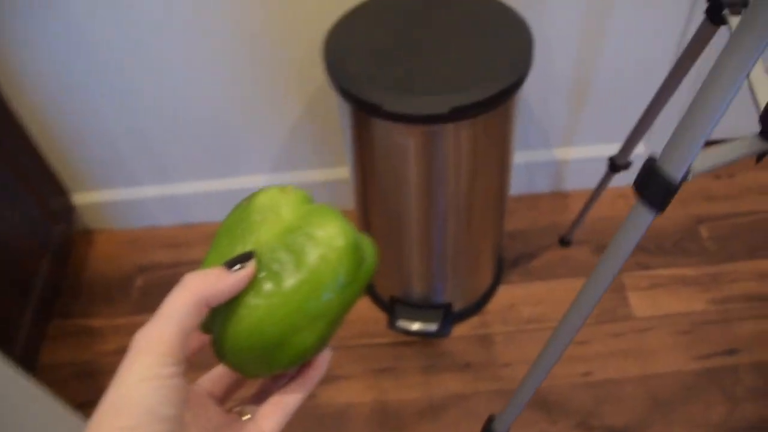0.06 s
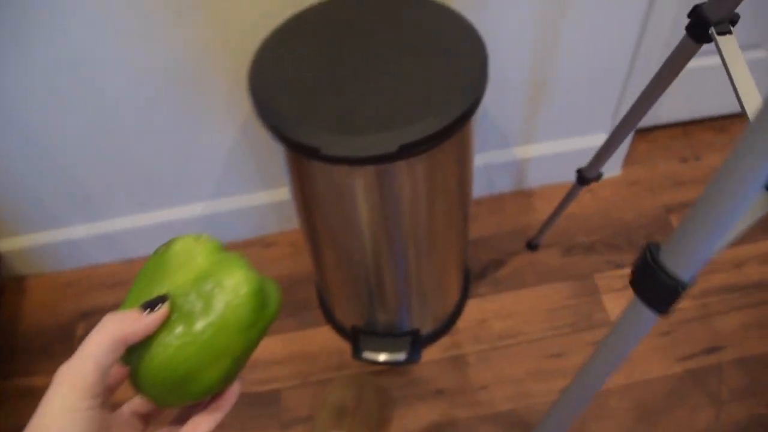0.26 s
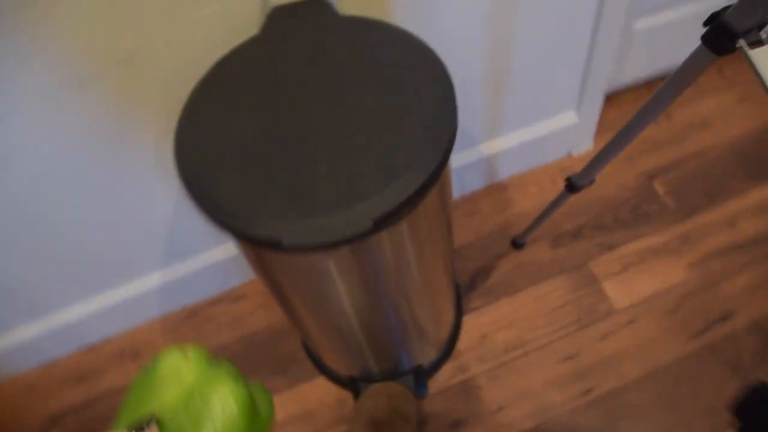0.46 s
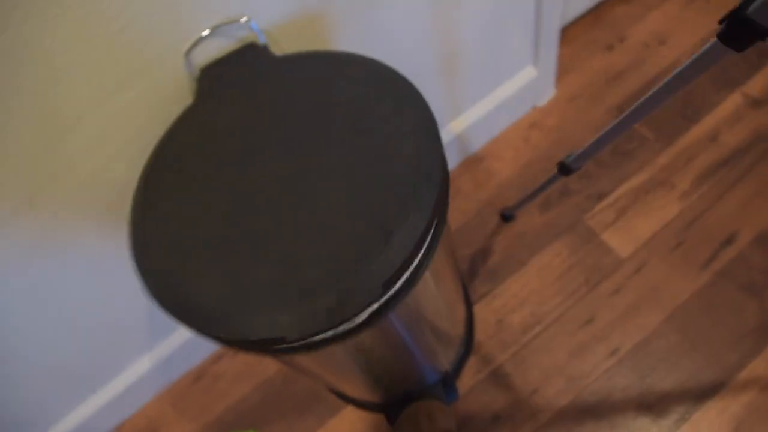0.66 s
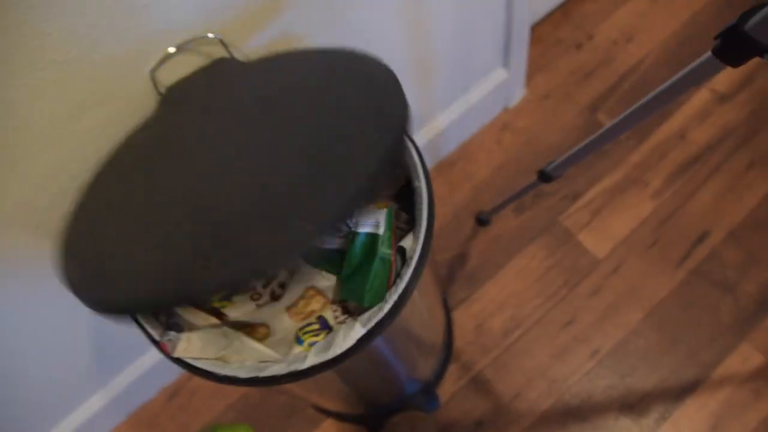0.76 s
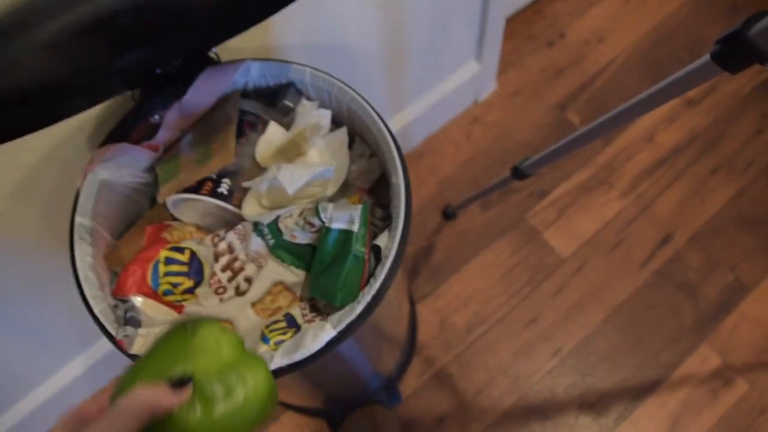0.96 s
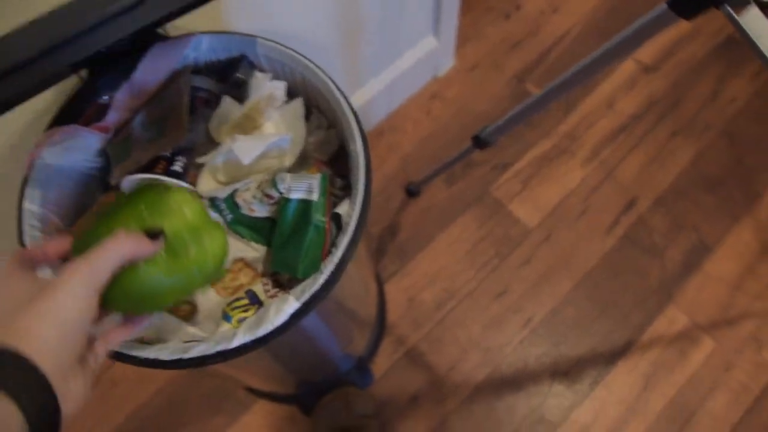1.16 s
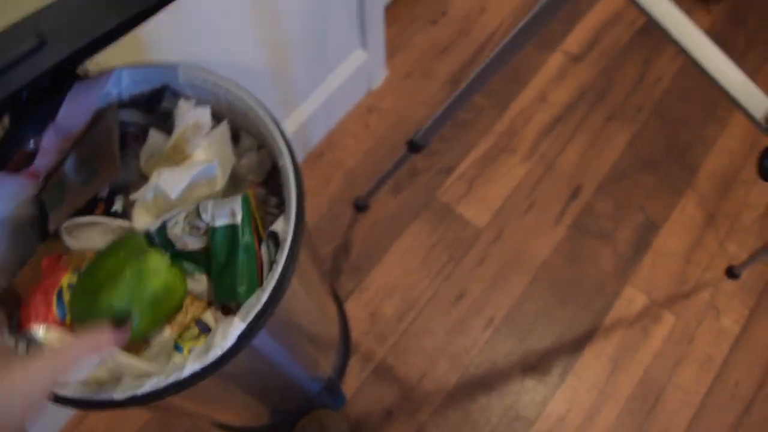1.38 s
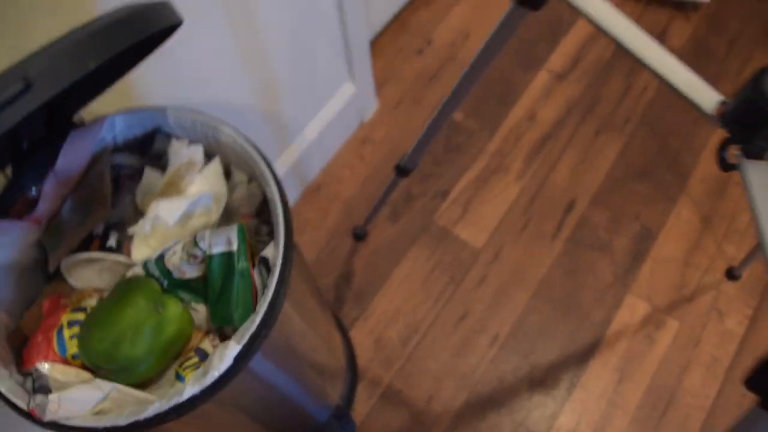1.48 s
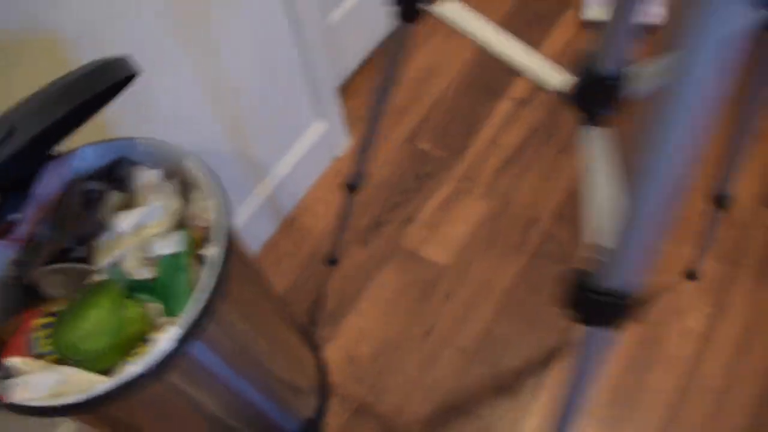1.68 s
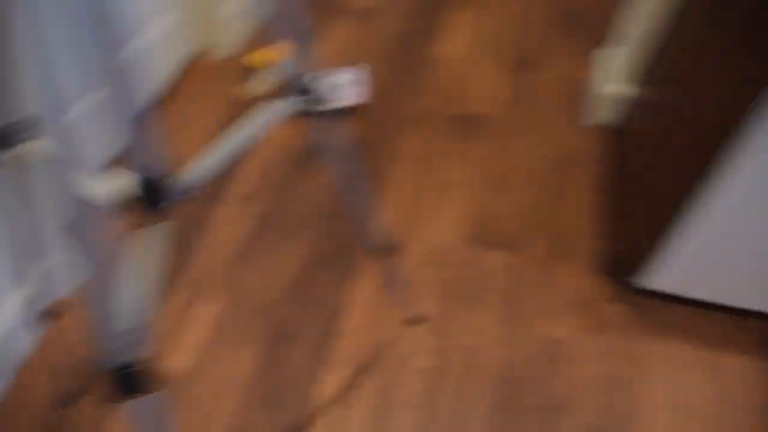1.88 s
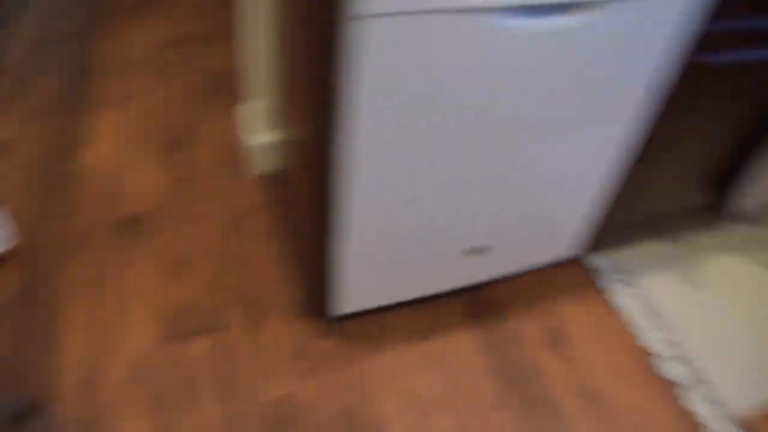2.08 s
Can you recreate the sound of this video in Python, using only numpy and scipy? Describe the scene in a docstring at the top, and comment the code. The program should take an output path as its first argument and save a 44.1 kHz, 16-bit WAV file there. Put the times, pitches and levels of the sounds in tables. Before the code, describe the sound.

A metal step-on bin knocks open, something thuds onto wrappers inside, and the lid claps shut.

```python
"""A small, hard kitchen, heard from just above a steel step-on bin.
The echo of a dull knock dies away; a shoe scuffs and clacks the pedal down. The lid knocks its way
open against its stop, booming as it flexes and ringing the can; the hinge rattles and squeaks.
A pepper thuds onto crackling wrappers. The lid claps shut among dull bumps of footfall and handling."""
import sys
import numpy as np
from scipy import signal
from scipy.fft import rfft, irfft, next_fast_len
from scipy.io import wavfile

SR = 44100
rng = np.random.default_rng(int(sys.argv[2]) if len(sys.argv) > 2 else 0)


def wrap_up_sound(samples):
    """Save the sound to the file named by the first command line argument, as 16-bit audio."""
    columns = np.atleast_2d(samples).T
    # keep every value between -1 and 1, then stretch to whole-number steps
    tamed = np.clip(columns, -1, 1)
    steps = np.round(tamed * 32767).astype(np.int16)
    wavfile.write(sys.argv[1], SR, steps)


N = 93977
LEAD_S, LANES = .2, 8
SIZE = next_fast_len(2 * N)
T = np.arange(SIZE) / SR


def undb(db):
    """Decibels to gain."""
    return 10 ** (np.asarray(db) / 20)


def bin_hz(size):
    """FFT bin frequencies, floored at 1 Hz."""
    return np.maximum(np.fft.rfftfreq(size, 1 / SR), 1)


def along(points, hz):
    """Read a table on a log-frequency axis."""
    freqs, values = np.array(points).T
    return np.interp(np.log(hz), np.log(freqs), values)


def unit(x):
    """Scale to unit energy."""
    return x / np.sqrt(np.sum(x ** 2) + 1e-18)


def track():
    """Empty lanes, one per echo pattern, since the listening point keeps moving."""
    return np.zeros((LANES, SIZE))


def add(lanes, s, db, x, over_s=.01):
    """Mix x into a random lane at time s; db is its RMS level if its energy were spread across over_s."""
    start = max(int((s + LEAD_S) * SR), 0)
    x = x[:SIZE - start]
    lanes[rng.integers(LANES), start:start + len(x)] += undb(db) * np.sqrt(SR * over_s) * unit(x)


def tint(x, colour, edge_hz=np.inf, size=4096):
    """Minimum-phase filter of the given colour, falling 12 dB/octave more above the edge."""
    hz = bin_hz(size)
    gain = undb(along(colour, hz)) / np.hypot(1, (hz / edge_hz) ** 2)
    cepstrum = irfft(np.log(gain))
    cepstrum[1:size // 2] *= 2
    cepstrum[size // 2 + 1:] = 0
    impulse = irfft(np.exp(rfft(cepstrum)))[:size // 2]
    return signal.fftconvolve(x, impulse)


def fade(t, t60_s):
    """Decay by 60 dB in t60_s."""
    return np.exp(-np.log(1000) * t / t60_s)


def crack(t60_s, rise_s=.00042):
    """A contact's dense, quickly dying vibration."""
    t = T[:int(2 * t60_s * SR) + 20]
    attack = np.minimum(t / rise_s, 1)
    envelope = fade(t, t60_s) * attack
    x = rng.standard_normal(2 ** 14)[:len(t)] * envelope
    for _ in range(3):  # flatten the spectrum, then restore the decay
        flat = irfft(np.exp(1j * np.angle(rfft(x))), len(t))
        x = flat * np.minimum(10 * envelope, 1)
    return x * attack


def ring(modes, contact_s=.0017):
    """Struck modes, neighbours in opposite phase, rising over the contact time."""
    t = T[:SR]
    swing = sum((-1) ** k * undb(db) * np.sin(2 * np.pi * hz * t) * fade(t, t60_s)
                for k, (hz, db, t60_s) in enumerate(modes))
    return swing * np.sin(np.pi / 2 * np.minimum(t / contact_s, 1)) ** 2


def grains(length_s, per_s, spread_db):
    """A swell of tiny random slips of uneven size."""
    n = int(length_s * SR)
    slips = rng.random(SR)[:n] < per_s / SR
    gain = undb(spread_db * np.minimum(rng.exponential(size=SR)[:n], np.pi))
    sign = rng.choice([-1, 1], SR)[:n]
    swell = np.sin(np.pi * np.arange(n) / n) ** .5
    return slips * sign * gain * swell


# room tone spectrum (frequency [Hz], gain [dB])
ROOM_TONE_COLOUR = [(25, 1), (60, -7.5), (140, 2.5), (250, -2), (450, 0.5), (1000, -4.5), (1600, -8),
                    (4400, -20), (11000, -36.5), (16000, -40)]


def room_tone(level_db=-53.5):
    """Quiet steady noise, returned as a spectrum."""
    noise = tint(rng.standard_normal(SIZE), ROOM_TONE_COLOUR)[:SIZE]
    return rfft(undb(level_db) * np.sqrt(SIZE) * unit(noise))


# dull knock spectrum (frequency [Hz], gain [dB])
DULL_KNOCK_COLOUR = [(60, -4), (190, -5.5), (400, -1.5), (950, 2.5), (2000, -9), (5000, -20.5),
                     (14000, -41)]


def dull_knock():
    """A knock just before time zero, heard only by its echo."""
    out = track()
    add(out, s=-.066, db=-26.5, x=tint(crack(t60_s=.021), DULL_KNOCK_COLOUR))
    return out


# shoe scuffs (time [s], length [s], level [dB], upper edge [Hz])
SCUFFS = [(0.231, 0.037, -49.5, 920), (0.287, 0.017, -46.5, 5000), (0.264, 0.057, -46.5, 12000),
          (1.672, 0.014, -32.5, 2400), (1.686, 0.079, -35.5, 1560), (1.767, 0.061, -52, 12100),
          (1.827, 0.058, -43.5, 2420), (1.886, 0.075, -32, 2450)]
# scuff spectrum (frequency [Hz], gain [dB])
SCUFF_COLOUR = [(80, -16), (300, -3), (550, 0), (850, -1), (1300, -6.5), (2300, -3), (5000, -9.5),
                (16000, -24)]


def scuffs():
    """The shoe rubs on floor and pedal."""
    out = track()
    for s, length_s, db, edge_hz in SCUFFS:
        friction = grains(length_s, per_s=2800, spread_db=3)
        add(out, s, db, tint(friction, SCUFF_COLOUR, edge_hz), over_s=length_s)
    return out


# pedal and linkage clacks (time [s], level [dB])
PEDAL_CLACKS = [(.351, -49), (.417, -47), (.4735, -21), (0.4758, -16.5), (.480, -18.5)]
# pedal clack spectrum (frequency [Hz], gain [dB])
PEDAL_COLOUR = [(40, -33), (90, -9), (160, -13), (250, -2), (330, -5.5), (470, 4), (680, -1), (800, 0.5),
                (970, -0.5), (1450, -6), (2000, -2), (2800, -6), (4300, -11.5), (6000, -22), (10000, -38.5),
                (14000, -48), (16000, -64)]
# steel pedal rod (frequency [Hz], gain [dB], t60 [s])
ROD_MODES = [(1290, 0, 0.043), (2010, -4, 0.028), (2624, 5, 0.026), (2860, 0, 0.052), (4006, -9, 0.047)]
# steel can (frequency [Hz], gain [dB], t60 [s])
CAN_MODES = [(270.3, 1, 0.25), (326, -5.5, 0.69), (351, 1, 0.51), (446, 5, 0.63), (695, -3.5, 0.6),
             (774, -8, 0.96), (907, -1.5, .65), (1123, -8.5, 0.31), (1200, -5.5, .85), (1335, -4.5, 0.77)]


def pedal(rod_db=-8, can_db=-13.5):
    """The pedal clacks, its rod clinks and the can rings faintly."""
    out, can, rod = track(), ring(CAN_MODES), ring(ROD_MODES)
    for s, db in PEDAL_CLACKS:
        add(out, s, db, tint(crack(t60_s=.055), PEDAL_COLOUR))
        add(out, s, db + rod_db, rod)
        add(out, s, db + can_db, can)
    return out


# opening knocks (time [s], boom level [dB], clack level [dB], clack edge [Hz], boom pitch [ratio])
LID_KNOCKS = [(0.6827, -28.5, -27.5, 1600, 1.02), (0.707, -32.5, -44, 1200, .97),
              (0.742, -27.5, -40, 1190, 1.01), (0.7617, -12, -20.5, 1100, .97),
              (0.7727, -12.5, -22.5, 1730, 1.08), (0.7878, -23.5, -24, 1570, .95),
              (.864, -12.5, -26, 3100, 1.03), (0.876, -19.5, -24.5, 2580, .95),
              (0.8975, -19, -19.5, 5000, 1.04), (.902, -27.5, -21, 3500, 1.01)]
# flexing lid (frequency [Hz], gain [dB], t60 [s])
LID_MODES = [(103.3, -22, 0.45), (140.5, -19, 0.17), (202, -10.5, 0.1), (245, -15.5, 0.17),
             (364.8, 8, 0.066), (446.6, 0.5, 0.075), (830, 4, 0.027)]
# lid clack spectrum (frequency [Hz], gain [dB])
LID_CLACK_COLOUR = [(50, -20), (150, -14), (380, 0.5), (700, 1), (1200, 1), (1600, -8), (3000, -18.5),
                    (5000, -15.5), (8000, -44), (16000, -45)]


def lid_opens(can_db=-9.5):
    """Each knock is a clack and a short boom of the flexing lid, which sets the can ringing."""
    clack, boom, can = track(), track(), ring(CAN_MODES)
    for s, boom_db, clack_db, edge_hz, pitch in LID_KNOCKS:
        modes = [(hz * pitch, db, t60_s) for hz, db, t60_s in LID_MODES]
        add(boom, s, boom_db, ring(modes))
        contact = crack(t60_s=.021, rise_s=.00096)
        add(clack, s, clack_db, tint(contact, LID_CLACK_COLOUR, edge_hz))
        add(boom, s, max(boom_db, clack_db) + can_db, can)
    return clack, boom


# hinge rattles (time [s], level [dB])
RATTLES = [(0.76, -41), (0.776, -37.5), (0.861, -33), (0.895, -30.5)]
# rattle spectrum (frequency [Hz], gain [dB])
RATTLE_COLOUR = [(300, -32), (1500, 2), (3000, 10), (5000, -5.5), (9000, -17.5), (16000, -33.5)]


def hinge_rattles():
    """The loose hinge rattles with the harder knocks."""
    out = track()
    for s, db in RATTLES:
        add(out, s, db, tint(crack(t60_s=.11, rise_s=.0016), RATTLE_COLOUR))
    return out


# hits on the stop (time [s], level [dB])
CLANKS = [(0.7884, -23.5), (.898, -17), (0.9021, -17)]
# lever and stop (frequency [Hz], gain [dB], t60 [s])
CLANK_MODES = [(420, 0.5, .022), (872, 3.5, 0.043), (1150, -7, 0.022), (1360, -5, 0.03)]


def stop_clanks():
    """The lid's steel lever hits its stop."""
    out, clank = track(), ring(CLANK_MODES)
    for s, db in CLANKS:
        add(out, s, db, clank)
    return out


# hinge squeaks (time [s], level [dB], pitch [Hz])
SQUEAKS = [(.8355, -33.5, 1923), (.8615, -24, 1956), (0.877, -35, 1973)]


def hinge_squeaks(length_s=.015, waver_depth=.056):
    """The hinge squeaks in short swelling tones of wavering pitch."""
    out, n = track(), int(length_s * SR)
    swell = np.sin(np.pi * np.arange(n) / n)
    for s, db, hz in SQUEAKS:
        waver = np.interp(T[:n], np.linspace(0, length_s, 10), rng.standard_normal(10))
        phase = 2 * np.pi * np.cumsum(hz * (1 + waver_depth * waver)) / SR
        add(out, s, db, np.sin(phase) * swell)
    return out


# pepper impacts (time [s], level [dB])
THUDS = [(1.3322, -41), (1.349, -24), (1.358, -21.5), (1.3653, -21)]
# thud spectrum (frequency [Hz], gain [dB])
THUD_COLOUR = [(35, -40), (60, -16), (170, -6.5), (323, 1.5), (469, -13.5), (850, -1.5), (1060, -6),
               (2090, -6.5), (2470, -20), (3420, -5), (4220, -25), (11000, -36), (16000, -44)]
# hollow above the rubbish (frequency [Hz], gain [dB], t60 [s])
HOLLOW_MODES = [(174, -2, 0.057), (240, -2.5, 0.074), (333, 4, 0.065), (410.4, -1.5, 0.1), (764, 6, 0.057),
                (878, 1.5, 0.23)]


def pepper(hollow_db=-3):
    """The pepper lands in quick stages and sounds the hollow of the bin."""
    out, hollow = track(), ring(HOLLOW_MODES)
    for s, db in THUDS:
        add(out, s, db, tint(crack(t60_s=.039), THUD_COLOUR))
        add(out, s, db + hollow_db, hollow)
    return out


# crease snaps (time [s], level [dB], upper edge [Hz], crease pitch [Hz])
SNAPS = [(1.338, -43, 3440, 2700), (1.3539, -29, 13200, 5660), (1.3671, -22, 6200, 3440),
         (1.3754, -36, 11000, 2920), (1.3858, -35, 9000, 3880), (1.441, -29, 6800, 3370),
         (1.453, -30, 5500, 1900), (1.47, -34.5, 4000, 3020), (1.4978, -29, 8950, 3240),
         (1.5155, -37, 14000, 4400), (1.5212, -27, 15200, 3510), (1.5308, -32, 5500, 3500),
         (1.545, -32.5, 6000, 3210), (1.5481, -27.5, 11000, 3250), (1.553, -32, 7140, 2630),
         (1.5628, -32.5, 4530, 2120), (1.5709, -34, 4500, 2260)]
# spells of crinkling (time [s], length [s], level [dB])
CRINKLES = [(1.348, 0.05, -34), (1.41, 0.052, -37.5), (1.503, 0.06, -35.5)]
# creased film and the hollows under it (frequency [Hz], gain [dB])
WRAPPER_COLOUR = [(100, -26.5), (320, 1), (550, 2), (800, 2), (1300, 1), (1900, 3.5), (2600, -1),
                  (3400, 3.5), (4300, -2), (6500, -4), (8000, -7), (14000, -11), (16000, -25)]


def wrappers(crease_db=-10.5):
    """Plastic wrappers snap under the weight and crinkle as the rubbish settles."""
    out = track()
    for s, db, edge_hz, crease_hz in SNAPS:
        add(out, s, db + crease_db, ring([(crease_hz, 0, .012)]))
        add(out, s, db, tint(crack(t60_s=.0109), WRAPPER_COLOUR, edge_hz))
    for s, length_s, db in CRINKLES:
        crinkle = grains(length_s, per_s=800, spread_db=2)
        add(out, s, db, tint(crinkle, WRAPPER_COLOUR, edge_hz=5000), over_s=length_s)
    return out


# dull bumps (time [s], level [dB], pitch [Hz])
BUMPS = [(1.713, -37, 100), (1.742, -37.5, 154), (1.762, -35.5, 113), (1.792, -34, 96), (1.846, -33.5, 214),
         (1.856, -27.5, 183), (1.882, -29.5, 135), (1.893, -33.5, 74.5), (1.945, -35.5, 90),
         (2.042, -30.5, 108)]


def bumps(t60_s=.051, side_db=8):
    """Footfall and handling: low thumps of a few cycles, unequal left and right."""
    mid, side = track(), track()
    side_colour = [(25, 3), (70, -14), (200, 1.5), (600, -18)]  # (frequency [Hz], gain [dB])
    for s, db, hz in BUMPS:
        add(mid, s, db, ring([(hz, 0, t60_s)]))
        add(side, s, db + side_db, tint(crack(t60_s=.1), side_colour, edge_hz=hz))
    return mid, side


# lid clap spectrum (frequency [Hz], gain [dB])
CLAP_COLOUR = [(180, -41.5), (300, -2.5), (379, -12.5), (565, -16), (1120, -14), (1900, -19.5),
               (4370, -19.5), (7000, -28.5), (11300, -48), (14500, -55), (16000, -69)]
# steel rim (frequency [Hz], gain [dB], t60 [s])
RIM_MODES = [(2160, -7, 0.033), (3454, -1.5, 0.074), (4840, 1, 0.023), (5100, 1, 0.03)]
# closed bin (frequency [Hz], gain [dB], t60 [s])
CLOSED_BIN_MODES = [(266, 6, 0.039), (459, -21, 0.52), (270.8, -12.5, 0.45), (577.4, -19, 0.59),
                    (222, -20, 0.012)]


def lid_shuts(at_s=1.9098, clap_db=-25, rim_db=-37.5, boom_db=-18.5):
    """The lid meets the rim: a sharp clap, a brief ring of steel and the boom of the closed bin."""
    clap, boom = track(), track()
    add(clap, at_s, clap_db, tint(crack(t60_s=.015), CLAP_COLOUR))
    add(clap, at_s, rim_db, ring(RIM_MODES))
    add(boom, at_s, boom_db, ring(CLOSED_BIN_MODES))
    return clap, boom


# kitchen decay (frequency [Hz], t60 [s])
ROOM_T60 = [(80, 0.48), (300, 0.65), (1000, 0.69), (3000, 0.54), (6000, 0.64), (14000, 0.44)]


def kitchen_echoes(delay_s=.0048, build_s=.0012):
    """Diffuse reflections off hard walls, one spectrum per lane; the top treble dies first."""
    centres_hz, t = np.geomspace(60, 16000, 7), T[:SR]
    noise = rfft(rng.standard_normal((LANES, SR)))
    tail = np.zeros((LANES, SR))
    for hz, weights in zip(centres_hz, np.eye(len(centres_hz))):
        band = along(list(zip(centres_hz, weights)), bin_hz(SR))
        tail += irfft(noise * band, SR) * fade(t, along(ROOM_T60, hz))
    onset = np.clip((t - delay_s) / build_s, 0, 1)
    return rfft(np.sqrt(LANES) * unit(tail * onset), SIZE)


# stereo width of the sounds (frequency [Hz], side gain [dB])
SOUND_WIDTH = [(60, -31), (110, -50), (200, -54), (380, -55), (700, -40), (1290, -40.5), (2380, -29),
               (4400, -26.5), (8120, -16), (15000, -8)]
# stereo width of the room tone (frequency [Hz], side gain [dB])
ROOM_TONE_WIDTH = [(60, -8), (110, -20), (200, -14.5), (380, -14), (1290, -20.5), (2380, -9.5), (4400, -16),
                   (8120, 0.5)]


def scene(direct_side_db=9):
    """All sources with their share of the room; nearly mono except in the treble and deep bass."""
    lid_clack, lid_boom = lid_opens()
    clanks, rattles, squeaks = stop_clanks(), hinge_rattles(), hinge_squeaks()
    clap, bin_boom = lid_shuts()
    bump_mid, bump_side = bumps()
    # (lanes, room send [dB])
    sources = [(dull_knock(), -.5), (pedal(), -4),
               (lid_clack, -2), (lid_boom, -9), (rattles, -2), (clanks, -9), (squeaks, -9),
               (pepper(), -5), (wrappers(), -7), (scuffs(), -4),
               (bump_mid, -7.5), (clap, -1), (bin_boom, -7.5)]
    direct = rfft(sum(lanes.sum(axis=0) for lanes, _ in sources))
    send = rfft(sum(lanes * undb(db) for lanes, db in sources))
    echoes, hz = kitchen_echoes(), bin_hz(SIZE)
    mid = irfft(direct + (send * echoes).sum(axis=0) + room_tone(), SIZE)
    spread = 1j * undb(direct_side_db) * direct + (send * echoes[::-1]).sum(axis=0)
    spread *= undb(along(SOUND_WIDTH, hz))
    spread += room_tone() * undb(along(ROOM_TONE_WIDTH, hz))
    side = irfft(spread, SIZE) + bump_side.sum(axis=0)
    start = int(LEAD_S * SR)
    return np.array([mid + side, mid - side])[:, start:start + N]


def record(dry):
    """Thin the bass below 48 Hz; cut the treble above 16 kHz."""
    highpass = signal.butter(2, 48, "high", fs=SR, output="sos")
    lowpass = signal.ellip(8, .2, 80, 16000, fs=SR, output="sos")
    return signal.sosfilt(lowpass, signal.sosfilt(highpass, dry))


dry = scene()
out = record(dry)
wrap_up_sound(out)
```